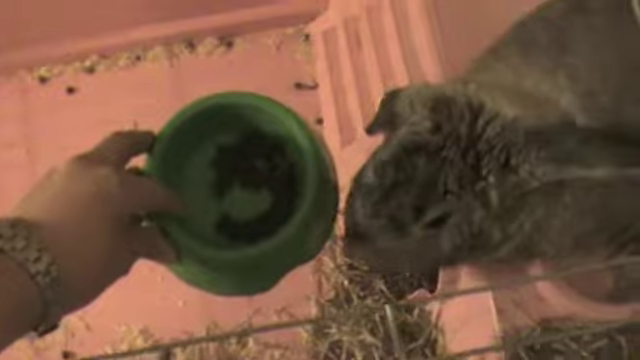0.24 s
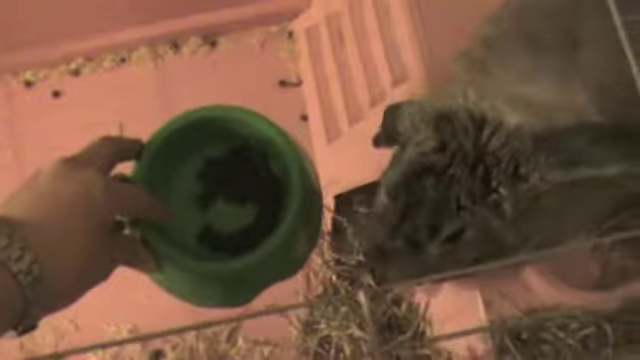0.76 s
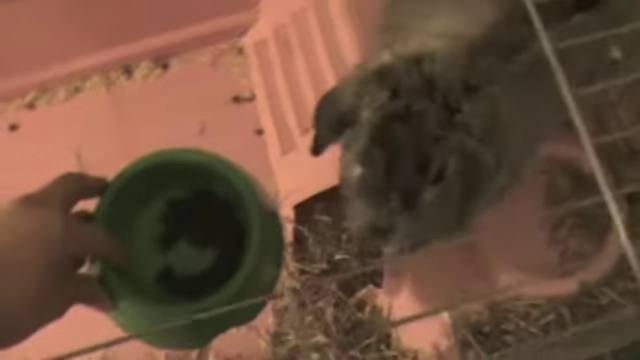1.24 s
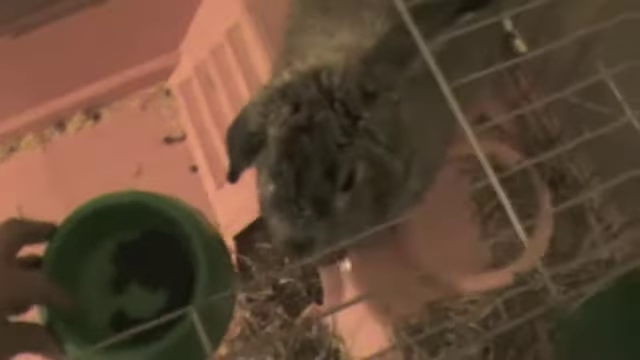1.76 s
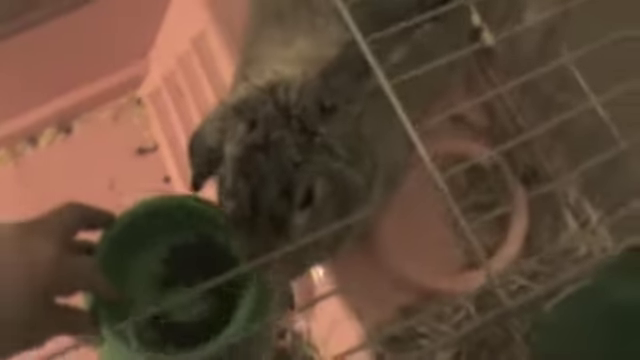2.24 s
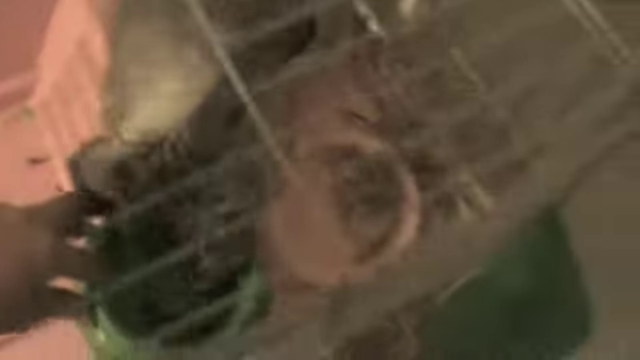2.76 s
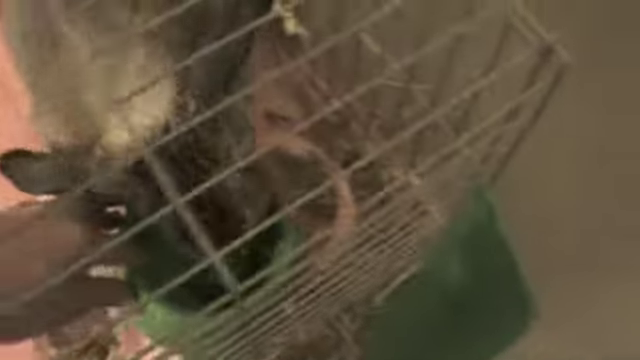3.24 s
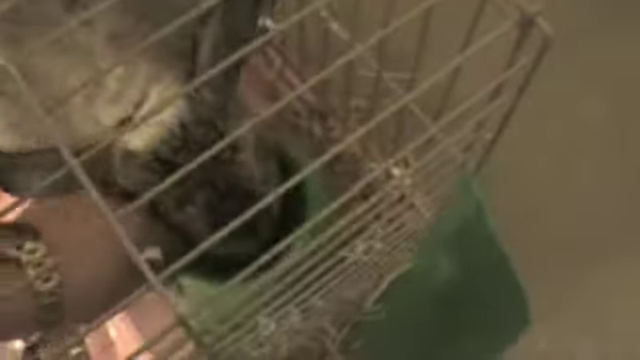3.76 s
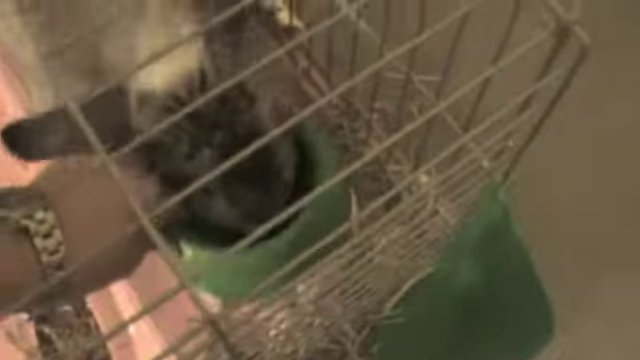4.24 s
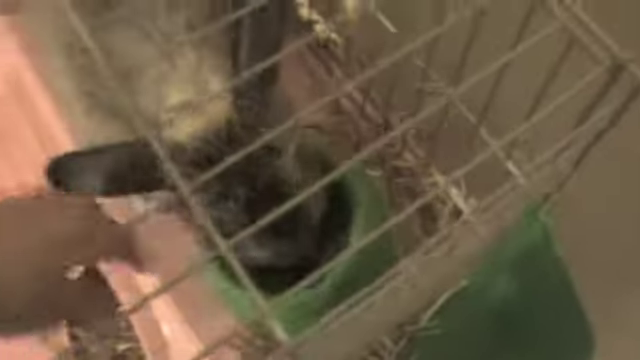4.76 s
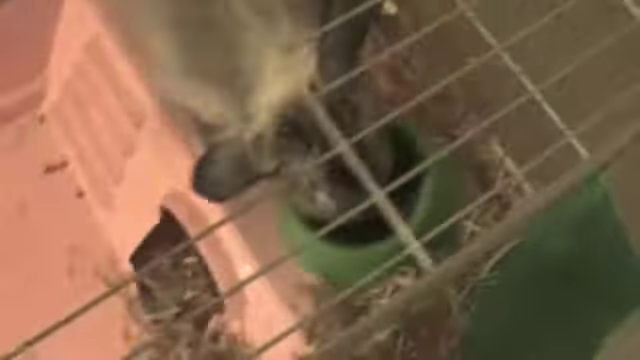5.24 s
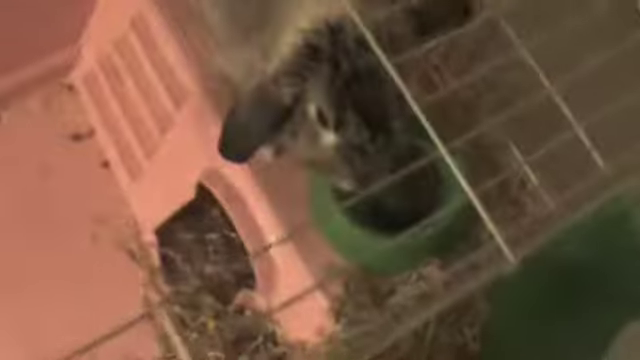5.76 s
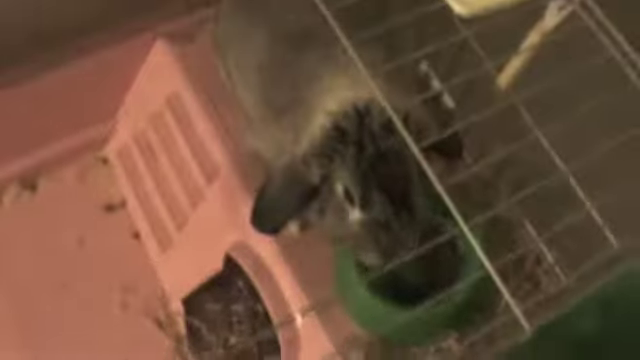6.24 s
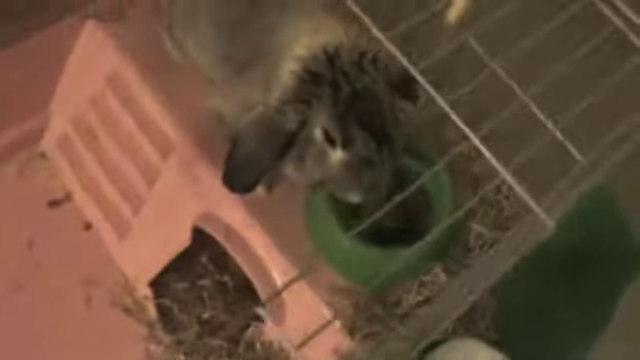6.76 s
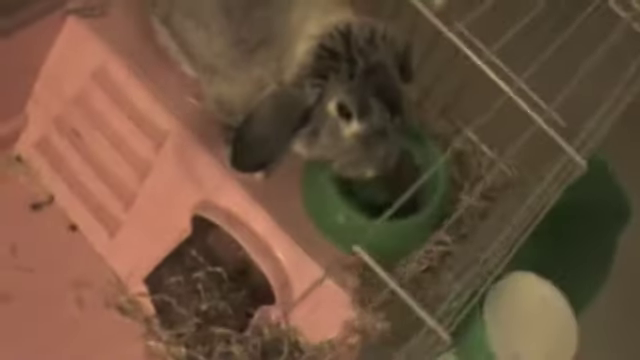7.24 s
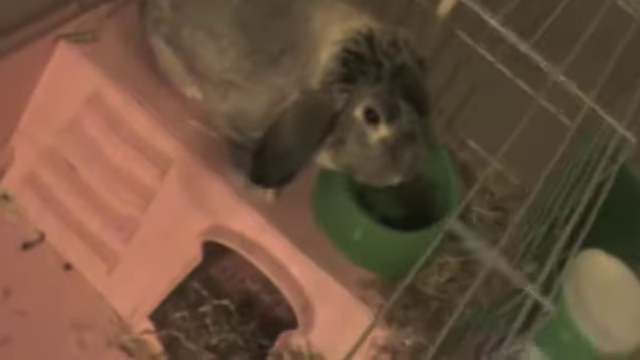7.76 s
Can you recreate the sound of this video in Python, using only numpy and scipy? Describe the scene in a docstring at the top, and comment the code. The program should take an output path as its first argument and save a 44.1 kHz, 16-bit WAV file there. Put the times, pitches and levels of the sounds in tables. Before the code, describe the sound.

Close stereo microphone beside an indoor rabbit cage, with steady low hiss and a faint hum. Soft paw thumps, dry straw ticks and muffled crunching come first. Midway, a food bowl bangs and drags over straw, the loose tray shuddering and hard pellets clattering in the bowl. Finally it calms to quiet rubbing, a few crisp chews and a barely audible squeak.

```python
"""A small quiet room, heard close up: a rabbit in its cage while a hand shoves a food bowl across straw.
Paws wake the low modes of a hollow plastic shelter; claws scuff, fur hisses and stalks snap as filtered slips.
The bowl scrapes in small jerks, knocks the tray's modes and leaves the tray shuddering after each blow.
Pellets tap and rattle the bowl's modes, chews crumble behind the cheeks, and two faint squeaks are wavering sines.
Short dense reflections surround it all, over steady noise and a slowly drifting low hum."""
import sys
import numpy as np
from scipy import signal
from scipy.fft import rfft, irfft
from scipy.io import wavfile

SR = 44100
rng = np.random.default_rng(int(sys.argv[2]) if len(sys.argv) > 2 else 0)


def transcribe(u):
    """Save the signal u as a 16-bit wav file named by the first command-line argument.

    u: samples, shape (n,) or (channels, n), limited to [-1, 1]; the rate is SR.
    q: integer samples, one column per channel.
    """
    v = np.clip(np.atleast_2d(u).T, -1, 1)
    q = np.round(v * 32767).astype(np.int16)
    wavfile.write(sys.argv[1], SR, q)


N = 352359
TIME_S = np.arange(N) / SR

# spectrum of the steady noise: (frequency [Hz], relative level [dB per Hz])
AIR_SPECTRUM = [(15, -59), (25, -29), (59, -62), (107, -2), (500, -2.5), (1400, -6.5), (3680, -11),
                (8050, -11), (15800, -16.5)]
AIR_RMS_DB = -57.5
# low hum: (time [s], level [dB])
HUM_LEVELS = [(0, -78), (.7, -62), (1.8, -61), (3.1, -69), (5.2, -63.5), (8, -73)]
HUM_HZ, HUM_WAVER_RMS_HZ = 54.9, 0.75

# paws landing on the shelter: (time [s], peak [dB], contact cut-off [Hz], claw scuff [dB])
PAW_LANDINGS = [(0.027, -38, 332, -52), (0.905, -19, 178, -46), (1.497, -31, 332, -53.5),
                (3.812, -33.5, 406, -65), (3.945, -37, 148, -50), (4.223, -38, 222, -52),
                (4.262, -36.5, 90, -61)]
# modes of the hollow shelter: (frequency [Hz], level [dB], t60 [s])
SHELTER_MODES = [(79.6, -15, 0.15), (117, 3, 0.15), (144, 21, 0.031), (167, -4, 0.11), (206, -5, 0.15),
                 (447, 6, 0.039)]

SCUFF_HALF_LENGTH_S, SCUFF_HZ, SCUFF_WIDTH_HZ = 0.0072, 2000, 2400
# fur along the plastic: (time [s], level [dB], half length [s], centre [Hz], narrow band against hiss [dB])
FUR_RUBS = [(0.401, -48.5, 0.022, 920, -13), (1.47, -52, 0.021, 576, 31), (1.764, -61.5, 0.046, 1710, -7),
            (2.897, -54, 0.0099, 3600, 22), (5.751, -50.5, 0.031, 2420, 2), (5.83, -43.5, 0.019, 2350, -15),
            (6, -54.5, 0.086, 3460, -33), (6.092, -49.5, 0.012, 2740, 8), (6.307, -53.5, 0.13, 880, -21),
            (6.496, -55.5, 0.08, 2820, 7), (6.715, -51.5, 0.075, 2920, -21), (6.99, -57, 0.15, 1860, 6),
            (7.84, -56.5, 0.24, 7450, -18)]
RUB_WIDTH_SHARE, CORE_WIDTH_SHARE = 2.3, 0.28  # widths of hiss and narrow band over the centre

# spectrum of the shuddering tray: (frequency [Hz], relative gain [dB])
RUMBLE_SPECTRUM = [(45, -47), (85, 1), (125, -5), (205, 2.5), (350, -3), (650, -4), (830, -6.5),
                   (1400, -20), (3500, -24), (8000, -70)]
WEIGHT_SHARE, PAW_WEIGHT_DB = 0.31, 11.5  # heavy blows shake the tray most
# level after a 0 dB blow, dB of shudder per dB of blow, dying time
SHUDDER_DB, SHUDDER_GROWTH, SHUDDER_FADE_S = -43, 0.49, 0.15
DRAG_SHUDDER_DB, FUR_SHUDDER_DB = -12, -8.5  # against the shoves and the rubs

# stalks snapping: (time [s], peak [dB], pitch [Hz])
STALK_SNAPS = [(0.5057, -25, 7300), (0.53, -32, 7760), (1.049, -42, 8800), (1.417, -35, 6800),
               (2.9657, -36.5, 3820), (3.031, -30, 7750), (4.003, -24, 9050), (5.5128, -27.5, 6400),
               (7.484, -26, 8900)]
# swishes through loose straw: (time [s], level [dB], half length [s])
STRAW_SWISHES = [(.509, -46, 0.012), (.819, -50.5, 0.01), (1.06, -54.5, 0.02), (1.353, -43.5, 0.0063),
                 (1.41, -56.5, 0.088), (2.6, -58.5, 0.1), (3.035, -50, 0.024), (3.19, -58.5, 0.14),
                 (4.851, -46.5, 0.026)]
# spectrum of a swish: (frequency [Hz], relative gain [dB])
SWISH_SPECTRUM = [(300, 9.5), (1500, 6.5), (3000, 8.5), (5000, 5.5), (8000, 10.5), (10000, 4.5)]

# chews: (time [s], peak [dB], pitch [Hz], crunch against the dull note [dB])
CHEW_BITES = [(0.738, -37.5, 540, -16), (1.238, -43.5, 556, -23), (1.698, -41.5, 750, -4),
              (1.77, -38.5, 576, -16), (2.047, -44.5, 625, -15), (2.217, -43, 1250, -11),
              (2.278, -38.5, 456, -10.5), (2.753, -39.5, 970, -8), (2.794, -36.5, 646, -18),
              (2.868, -43.5, 940, -19), (3.045, -36, 790, -16), (3.222, -39, 780, -22),
              (6.5186, -31, 570, -21), (6.57, -35, 596, -12.5), (6.862, -39.5, 560, -21),
              (7.22, -44.5, 650, -14.5), (7.429, -45, 646, -20), (7.446, -38, 640, -19),
              (7.71, -40.5, 595, -13)]
CRUMBLE_HZ, CRUMBLE_WIDTH_HZ = 1600, 1770  # the crunch that escapes between the lips

# bowl bumping on the tray: (time [s], peak [dB], contact cut-off [Hz], weight on the low modes [dB])
BOWL_KNOCKS = [(1.4955, -40.5, 2000, 2), (3.3041, -8.5, 2590, 3.5), (3.561, -28.5, 1500, -12),
               (3.653, -29, 885, 27), (4.254, -33, 1710, 11), (4.3319, -26.5, 1500, 16),
               (4.4303, -11.5, 1260, 20), (4.5646, -16.5, 2200, 28), (4.629, -32, 1100, 1),
               (5.008, -32, 1190, -6), (5.024, -40.5, 1300, -8)]
# modes of the tray: (frequency [Hz], level [dB], t60 [s])
TRAY_MODES = [(115, -14.5, 0.066), (208, -12, 0.058), (279.3, -17, 0.12), (500, 10, 0.038),
              (580.4, 2, 0.079), (784, 14.5, 0.017), (994, 6.5, 0.044), (1267, 9, 0.012),
              (1830, 10, 0.0068), (3770, -3, 0.03)]

# pellets and teeth on the bowl: (time [s], peak [dB], brightness [dB per octave], ping of the spot [Hz])
BOWL_TAPS = [(3.9223, -26.5, 9.5, 1520), (4.032, -20.5, 4, 1890), (4.037, -27, 3.5, 1590),
             (4.121, -27, -18, 780), (4.159, -34, 2, 1510), (4.517, -36, 3, 1000), (4.553, -26, 0, 1840),
             (4.651, -28, -1, 1000), (4.75, -27, 5, 1095), (4.7565, -27.5, 0, 2350),
             (4.8262, -24.5, 24, 1600), (4.8402, -20.5, 8, 1540), (4.859, -28, 3, 1600),
             (4.8665, -27, 5.5, 1200), (4.9163, -14.5, 0.5, 890), (4.954, -26, -29, 840),
             (5.098, -33, 13, 1590), (5.1265, -29.5, -3, 820), (5.153, -33, -6, 1480),
             (5.161, -31.5, -17, 950), (5.203, -34, 1, 1570), (5.2075, -32, -5, 1500),
             (5.4936, -22.5, 0, 870), (5.514, -31, 8, 1200), (5.5472, -9, -8, 1500), (5.566, -17, 3, 1430),
             (5.5778, -26.5, 8, 900), (5.6084, -27.5, 11, 2020)]
# modes of the bowl: (frequency [Hz], level [dB], t60 [s])
BOWL_MODES = [(557, -22, 0.012), (720, 0.5, 0.018), (766, -12.5, 0.29), (883, 11.5, 0.012),
              (1100, 4, 0.022), (1553, 4, 0.02), (1560, -25, 0.13), (2090, 2, 0.0051), (3200, -17, 0.013),
              (4000, -13.5, 0.0066), (8700, -33, 0.004)]
TOUCH_LEAD_S, TOUCH_DB = 0.0038, -22  # light first touch, against its tap
PING_DB, PING_T60_S = -9, 0.017
ROLL_DETUNE_SHARE, ROLL_DB_PER_OCTAVE = 0.083, 2  # the modes differ from spot to spot
# level after a 0 dB jolt, dB of rattle per dB of jolt, dying time
SETTLE_DB, SETTLE_GROWTH, SETTLE_FADE_S = -37, 0.54, 0.065
# pellets stirred in the bowl, by the nose or shaken loose by heavy knocks: (time [s], level [dB], half length
# [s])
PELLET_STIRRINGS = [(4.47, -41.5, 0.071), (4.575, -38, 0.018), (4.67, -50, 0.06), (4.823, -36, 0.011),
                    (4.868, -34, 0.017)]

# bowl shoved over straw: (start [s], build-up length [s], level [dB])
BOWL_SHOVES = [(3.177, 0.5, -35.5), (3.485, 0.019, -42), (3.714, 0.16, -37.5), (3.792, 0.26, -39.5),
               (4.087, 0.053, -38.5), (4.162, 0.24, -39.5), (4.497, 0.07, -42.5)]
BUILD_POWER, STOP_S, COAST_SHARE = 1.28, 0.028, 0.13  # a longer shove takes longer to come to rest
# spectrum of straw slipping under the bowl: (frequency [Hz], relative gain [dB])
SCRAPE_SPECTRUM = [(350, -12), (600, -1), (810, -1.5), (1140, -19), (1470, -8), (1980, -12), (3120, -11),
                   (4710, -10.5), (8500, -3.5), (11000, -14), (13500, -22), (15800, -18)]
# resonances of the moving bowl: (frequency [Hz], width [Hz], level [dB])
SCRAPE_RESONANCES = [(890, 54, -9), (1540, 490, 2), (2350, 150, -16), (3110, 190, 3), (3660, 410, 0.5),
                     (8340, 600, -22)]
SKITTER_DB, SKITTERS_PER_S = -7, 45  # level against the scrape; rate per resonance

# tufts crushed under the bowl: (time [s], level [dB], dying time [s], centre [Hz])
TUFT_CRUNCHES = [(3.506, -35, 0.013, 2660), (3.694, -29, 0.0042, 5600), (3.7136, -31, 0.0028, 4000),
                 (3.743, -35, 0.002, 5000), (3.772, -36, 0.0044, 9500), (3.878, -33, 0.0036, 8680),
                 (3.922, -27, 0.0023, 3700), (4.135, -35.5, 0.0051, 8600), (4.401, -36, 0.0033, 9000),
                 (4.471, -41, 0.0037, 8500)]
CRUNCH_WIDTH_SHARE = 0.3  # width over the centre

# faint squeaks: (time [s], level [dB], half length [s], pitch [Hz])
SQUEAK_TONES = [(5.383, -44, 0.0029, 1060), (7.092, -57.5, 0.039, 1038)]

# decay of the room: (frequency [Hz], t60 [s])
ROOM_DECAY = [(100, 0.52), (500, 0.43), (1400, 0.23), (4000, 0.14), (12000, 0.12)]
# phase of left against right: (frequency [Hz], phase [rad])
PORT_PHASES = [(40, 0.15), (140, 0.15), (750, 0.33), (2000, 0.24), (4000, 0.47), (8000, 0.071)]
# level of left against right: (frequency [Hz], level [dB])
PORT_LEVELS = [(60, 0.021), (500, 0.8), (4000, 1.4), (9000, -0.25)]
EDGE_HZ = 15900


def amp(db):
    """Decibels to gain."""
    return 10 ** (np.asarray(db) / 20)


def unit(x):
    """Scales to rms 1."""
    return x / np.sqrt(np.mean(x ** 2) + 1e-20)


def peaked(x, db):
    """Scales to a peak level."""
    return amp(db) * x / np.abs(x).max()


def read(points, hz):
    """Reads a table on a log-frequency axis."""
    f, value = np.transpose(points)
    return np.interp(np.log(hz + 1), np.log(f + 1), value)


def colour(x, points):
    """Filters by a gain table, then scales to rms 1."""
    gain = amp(read(points, np.fft.rfftfreq(N, 1 / SR)))
    return unit(irfft(rfft(x) * gain, N))


def add(mix, s, sound):
    """Mixes a sound in at a time."""
    part = mix[max(round(s * SR), 0):][:len(sound)]
    part += sound[:len(part)]


def soften(x, hz, order=2):
    """Low-pass."""
    return signal.sosfilt(signal.butter(order, min(hz, SR / 2 - 1), fs=SR, output="sos"), x)


def thin(x, hz, order=3):
    """High-pass: a small body radiates no deep bass."""
    return signal.sosfilt(signal.butter(order, hz, "high", fs=SR, output="sos"), x)


def resonate(x, hz, width):
    """A resonance of gain 1."""
    b, a = signal.iirpeak(hz, hz / min(width, SR / 3), fs=SR)
    return signal.lfilter(b, a, x)


def resonate_twice(x, hz, width, second_width):
    """Two resonances in series at one frequency."""
    return resonate(resonate(x, hz, width), hz, second_width)


def strokes(rows):
    """Gain over time of smooth swells, from rows (time [s], level [dB], half length [s])."""
    power = np.zeros(N)
    for s, db, length, *_ in rows:
        near = slice(*np.searchsorted(TIME_S, [s - 5 * length, s + 5 * length]))
        power[near] += amp(db) ** 2 * np.exp(-((TIME_S[near] - s) / length) ** 2)
    return np.sqrt(power)


def aftermath(blows, growth, fade_s):
    """Gain over time of shaking set off by blows (time [s], level [dB]) and dying away."""
    kicks = np.zeros(N)
    for s, db, *_ in blows:
        kicks[round(s * SR)] += amp(growth * db) ** 2
    power_decay = np.exp(-2 / (fade_s * SR))
    return np.sqrt(signal.lfilter([1], [1, -power_decay], kicks + 1e-30))


def ring(hz, db, t60, size=16000):
    """Damped modes set off together, neighbours moving in opposite directions."""
    t = np.arange(size)[:, None] / SR
    sign = (-1) ** np.arange(len(hz))
    decay = amp(db - 60 * t / t60)
    return (sign * decay * np.sin(2 * np.pi * hz * t)).sum(1)


def grains(per_s, spread_db):
    """Random slips: many small, a few large."""
    size = amp(spread_db * np.minimum(rng.exponential(1, N), 4))
    return unit(rng.choice([-1, 1], N) * size * (rng.random(N) < per_s / SR))


def crack(crumbs_per_s, crumb_db, fade_s, size=4000):
    """One break followed by a dying shower of mostly smaller ones."""
    t = np.arange(size) / SR
    crumbs = rng.standard_normal(size) * (rng.random(size) < crumbs_per_s / SR)
    breaks = amp(crumb_db) * crumbs * np.exp(-t / fade_s)
    breaks[0] = 1
    return breaks


def contact(hz, fade_s, size=16000):
    """The brief broad tick of two hard surfaces meeting, at peak 1."""
    tick = rng.standard_normal(size) * np.exp(-np.arange(size) / SR / fade_s)
    return peaked(thin(soften(tick, hz), 780), 0)


def background():
    """Steady noise, differing between the two sides through the middle band but nearly alike in the deep bass
    and top treble, and a slowly drifting hum over a faint rumble."""
    mid, side = amp(AIR_RMS_DB) * colour(rng.standard_normal((2, N)), AIR_SPECTRUM)
    side = thin(soften(side, 3340), 480, order=1)
    waver = unit(soften(rng.standard_normal(N), 1.44))
    tone = np.sin(2 * np.pi * np.cumsum(HUM_HZ + HUM_WAVER_RMS_HZ * waver) / SR)
    rumble = unit(resonate_twice(rng.standard_normal(N), HUM_HZ, HUM_HZ, HUM_HZ))
    hum = unit(tone + amp(-11) * rumble)
    hum_gain = amp(np.interp(TIME_S, *np.transpose(HUM_LEVELS)))
    return mid + hum * hum_gain + side * np.array([[1], [-1]])


def paws():
    """Soft contacts wake only the low modes of the hollow plastic."""
    out, modes = np.zeros(N), ring(*np.transpose(SHELTER_MODES))
    for s, peak_db, contact_hz, _ in PAW_LANDINGS:
        thud = thin(soften(modes, contact_hz, order=3), 64, order=3)
        add(out, s, peaked(thud, peak_db))
    return out


def claws_and_fur():
    """Claws scuff as each paw lands and fur rubs the plastic: many small slips in soft strokes."""
    fibres = soften(grains(per_s=8200, spread_db=1.5), 9100, order=6)
    scuffs = [(s + SCUFF_HALF_LENGTH_S / 2, db, SCUFF_HALF_LENGTH_S) for s, _, _, db in PAW_LANDINGS]
    out = unit(resonate(fibres, SCUFF_HZ, SCUFF_WIDTH_HZ)) * strokes(scuffs)
    for s, db, length, hz, core_db in FUR_RUBS:
        hiss = resonate(fibres, hz, RUB_WIDTH_SHARE * hz)
        core = resonate(fibres, hz, CORE_WIDTH_SHARE * hz)
        out += unit(hiss + amp(core_db) * core) * strokes([(s, db, length)])
    return out


def shudder():
    """The loose tray rumbles after paws and knocks, and under the sliding bowl and rubbing fur."""
    knocked = [(s, db + WEIGHT_SHARE * weight_db) for s, db, _, weight_db in BOWL_KNOCKS]
    trodden = [(s, db + PAW_WEIGHT_DB) for s, db, *_ in PAW_LANDINGS]
    struck = amp(SHUDDER_DB) * aftermath(knocked + trodden, SHUDDER_GROWTH, SHUDDER_FADE_S)
    rubbed = amp(DRAG_SHUDDER_DB) * push() + amp(FUR_SHUDDER_DB) * strokes(FUR_RUBS)
    rumble = colour(grains(per_s=180, spread_db=3.0), RUMBLE_SPECTRUM)
    return rumble * np.hypot(struck, rubbed)


def straw():
    """Dry stalks snap as resonant cracks; loose ones swish as showers of slips."""
    out = np.zeros(N)
    for s, peak_db, hz in STALK_SNAPS:
        snap = crack(crumbs_per_s=1600, crumb_db=-5.5, fade_s=0.0028)
        stalk = soften(resonate_twice(snap, hz, 0.2 * hz, 0.9 * hz), 11000, order=4)
        add(out, s, peaked(stalk, peak_db))
    slips = soften(grains(per_s=4000, spread_db=2.8), 9800, order=6)
    return out + colour(slips, SWISH_SPECTRUM) * strokes(STRAW_SWISHES)


def chews():
    """A pellet crumbles between the teeth: a dull note through the cheeks, a crunch through the lips."""
    out = np.zeros(N)
    for s, peak_db, hz, crunch_db in CHEW_BITES:
        bite = crack(crumbs_per_s=600, crumb_db=-4.5, fade_s=0.016)
        cheek = resonate_twice(bite, hz, 0.49 * hz, 0.81 * hz)
        lips = resonate_twice(bite, CRUMBLE_HZ, CRUMBLE_WIDTH_HZ, CRUMBLE_WIDTH_HZ)
        add(out, s, peaked(cheek + amp(crunch_db) * lips, peak_db))
    return out


def knocks():
    """The bowl meets the tray; the more weight behind it, the more the tray booms."""
    out, (hz, db, t60) = np.zeros(N), np.transpose(TRAY_MODES)
    for s, peak_db, contact_hz, weight_db in BOWL_KNOCKS:
        modes = ring(hz, db + weight_db / (1 + (hz / 340) ** 5), t60)
        chatter = crack(crumbs_per_s=450, crumb_db=-13.5, fade_s=0.012)  # loose pellets jump and land
        boom = thin(soften(signal.fftconvolve(modes, chatter), contact_hz), 109, order=4)
        add(out, s, peaked(boom, peak_db))
        add(out, s, amp(peak_db - 21.0) * contact(hz=3260, fade_s=0.012))
    return out


def pellet_rattle():
    """Pellets roll over the bowl's modes and grind on one another, stirred by the nose or jolted."""
    hz, db, t60 = np.transpose(BOWL_MODES)
    tilted_db = db + ROLL_DB_PER_OCTAVE * np.log2(hz / hz[0])
    rattle = np.zeros(N)
    for detune in rng.standard_normal((5, len(hz))):  # five spots at once
        modes = ring(hz * (1 + ROLL_DETUNE_SHARE * detune), tilted_db, t60)
        rattle += signal.oaconvolve(grains(per_s=260, spread_db=2.2), modes)[:N]
    grit = resonate(grains(per_s=2500, spread_db=7.5), 2600, 5600)
    grit = unit(soften(grit, 10100, order=4))
    settling = amp(SETTLE_DB) * aftermath(BOWL_TAPS + BOWL_KNOCKS, SETTLE_GROWTH, SETTLE_FADE_S)
    return (unit(thin(rattle, 800)) + amp(-10.0) * grit) * np.hypot(strokes(PELLET_STIRRINGS), settling)


def bowl_taps():
    """Each tap rings the bowl at another spot, with a ping, a light first touch and small after-cracks."""
    out, (hz, db, t60) = np.zeros(N), np.transpose(BOWL_MODES)
    for s, peak_db, bright_db, ping_hz in BOWL_TAPS:
        spot, detune = rng.standard_normal((2, len(hz)))
        spot_db = db + bright_db * np.log2(hz / hz[0]) + 2 * spot
        modes = thin(ring(hz * (1 + 0.038 * detune), spot_db, t60), 690, order=4)
        ping = ring(np.array([ping_hz]), PING_DB, PING_T60_S)
        after = crack(crumbs_per_s=250, crumb_db=-19, fade_s=0.018)
        body = signal.fftconvolve(peaked(modes, 0) + ping, after)[:len(modes)]
        tick = amp(peak_db - 19.0 + 0.74 * bright_db) * contact(hz=4360, fade_s=0.003)
        tap = peaked(body, peak_db) + tick
        add(out, s, tap)
        add(out, s - TOUCH_LEAD_S, amp(TOUCH_DB) * tap)
    return out


def push():
    """Gain over time of the sliding bowl: each shove builds until the hand lets off, then coasts to a stop."""
    power, t = np.zeros(N), np.arange(SR) / SR
    for start, length, db in BOWL_SHOVES:
        build = np.minimum(t / length, 1) ** BUILD_POWER
        coast = np.exp(-np.maximum(t - length, 0) / (STOP_S + COAST_SHARE * length))
        add(power, start, (amp(db) * build * coast) ** 2)
    return np.sqrt(power)


def slide():
    """Straw slips in small jerks under the bowl; loose pellets hop inside, ringing its resonances."""
    jerks = amp(2.3 * unit(soften(rng.standard_normal(N), 110)))
    slips = colour(grains(per_s=20000, spread_db=0.0) * jerks, SCRAPE_SPECTRUM)
    rings = sum(amp(db) * resonate(slips, hz, width) for hz, width, db in SCRAPE_RESONANCES)
    scrape = unit(slips + rings)
    skitter = np.zeros(N)
    for hz, width, _ in SCRAPE_RESONANCES:
        hops = grains(SKITTERS_PER_S, spread_db=3.0)
        skitter += unit(resonate_twice(hops, hz, width, 0.5 * hz))
    return unit(scrape + amp(SKITTER_DB) * unit(skitter)) * push()


def crunches():
    """Tufts caught under the bowl are crushed: dying bursts of band-limited noise."""
    out, t = np.zeros(N), np.arange(SR) / SR
    for s, db, fade_s, hz in TUFT_CRUNCHES:
        burst = unit(resonate_twice(rng.standard_normal(SR), hz, CRUNCH_WIDTH_SHARE * hz, 2 * hz))
        add(out, s, amp(db) * burst * np.exp(-t / fade_s))
    return out


def squeaks():
    """Brief, slightly wavering tones."""
    waver = 1 + 0.0024 * unit(soften(rng.standard_normal(N), 42))
    wavering_s = np.cumsum(waver) / SR
    out = np.zeros(N)
    for s, db, length, hz in SQUEAK_TONES:
        out += np.sin(2 * np.pi * hz * wavering_s) * strokes([(s, db, length)])
    return out


def room(x, side_db=-8, size=22050):
    """Dense reflections from the cage and walls, the treble dying first."""
    echoes = rng.choice([-1., 1.], (2, size)) * (rng.random((2, size)) < 3000 / SR)
    hz, t, z = signal.stft(echoes, SR, nperseg=256)
    fade = amp(-60 * t / read(ROOM_DECAY, hz)[:, None])
    fade = fade * (1 + 0.65 * np.exp(-t / 0.0063))  # stronger early reflections
    tail = signal.istft(z * fade, SR, nperseg=256)[1]
    tail *= np.clip(np.arange(tail.shape[1]) / SR / 0.00132 - 1, 0, 1)  # gap before the first echo
    tail /= np.linalg.norm(tail[0])
    mid, side = signal.fftconvolve(x[None], tail, axes=1)[:, :N]
    side = amp(side_db) * thin(soften(side, 4000), 320, order=1)  # bass and top treble nearly alike
    return np.array([mid + side, mid - side])


def ports(x):
    """Two microphone ports hear the cage with a small difference in phase and level."""
    hz = np.fft.rfftfreq(N, 1 / SR)
    half = amp(read(PORT_LEVELS, hz) / 2) * np.exp(0.5j * read(PORT_PHASES, hz))
    return irfft(rfft(x) * np.array([half, 1 / half]), N)


def scene():
    """Cage sounds and their reflections, slightly to the left, over the background."""
    steps, bites, bumps = paws(), chews(), knocks()
    taps = pellet_rattle() + bowl_taps()
    rubbing = claws_and_fur() + shudder() + straw() + slide() + crunches() + squeaks()
    send = amp(-10.0) * steps + amp(-9.0) * bites + amp(-11.0) * bumps
    send += amp(-14.5) * taps + amp(-10.5) * rubbing
    direct = steps + bites + bumps + taps + rubbing
    return ports(direct + room(send)) + background()


def record(dry):
    """Linear-phase low-pass at the upper band edge."""
    kernel = signal.firwin(511, EDGE_HZ, window=("kaiser", 9), fs=SR)
    return signal.oaconvolve(dry, kernel[None], "same")


dry = scene()
out = record(dry)
transcribe(out)
```